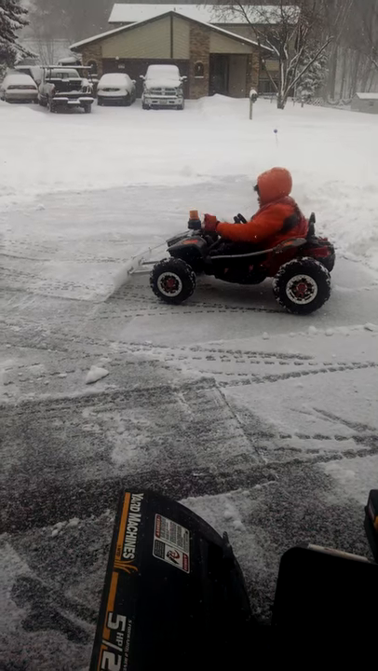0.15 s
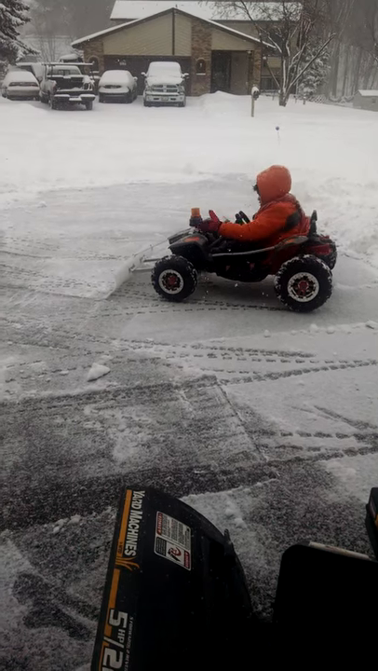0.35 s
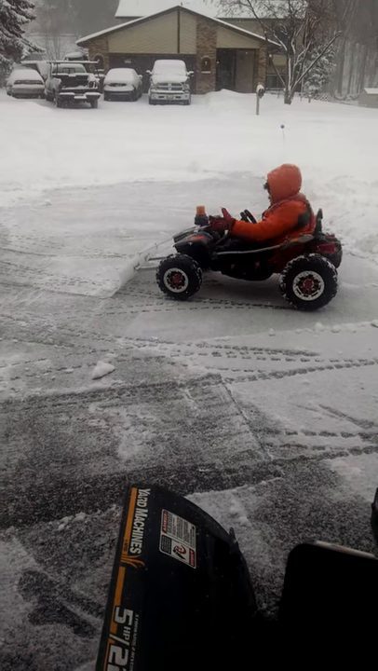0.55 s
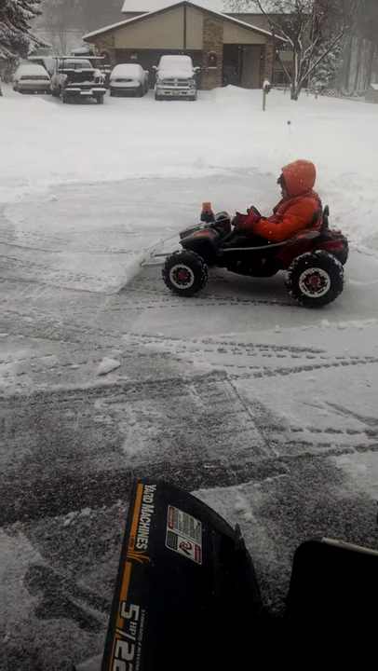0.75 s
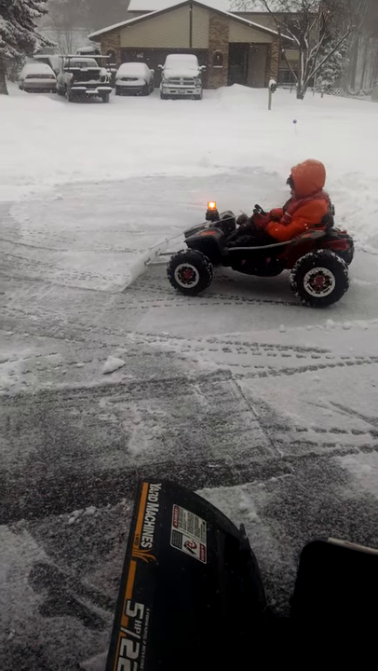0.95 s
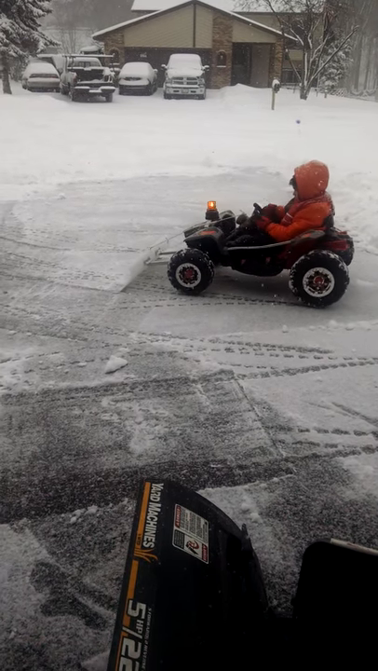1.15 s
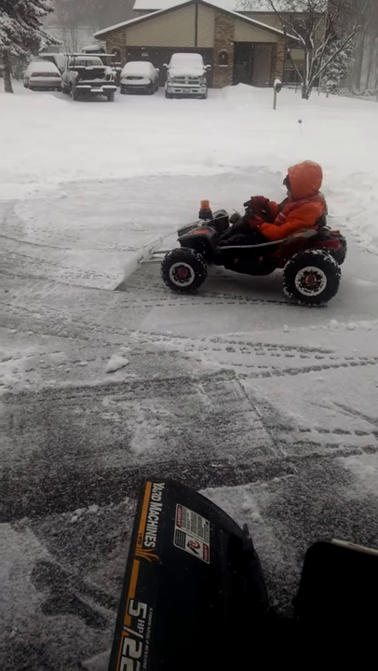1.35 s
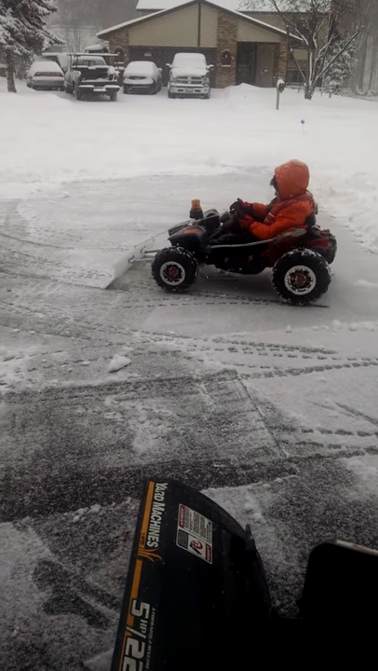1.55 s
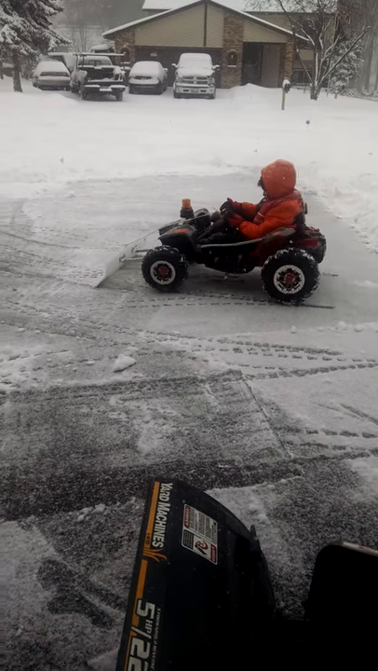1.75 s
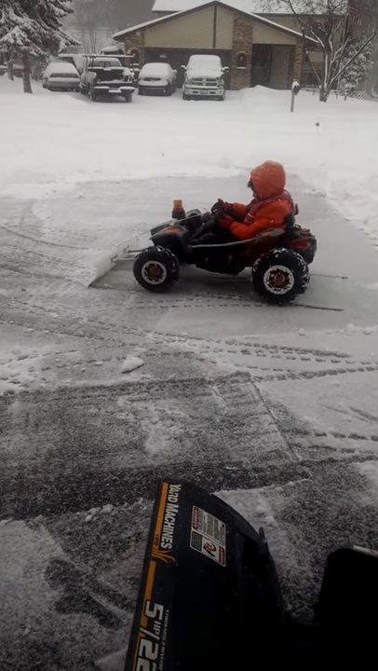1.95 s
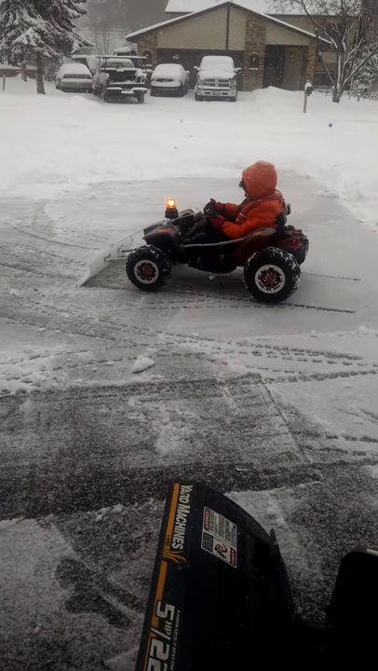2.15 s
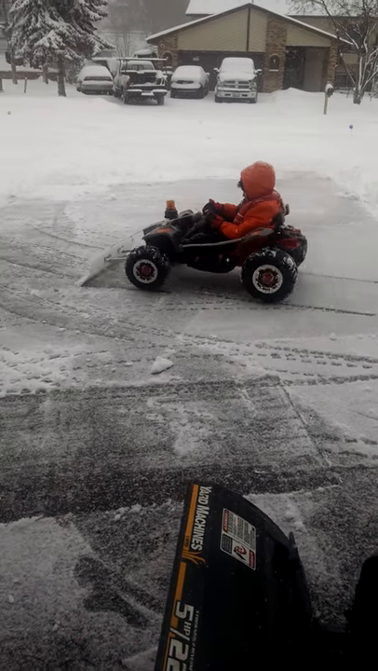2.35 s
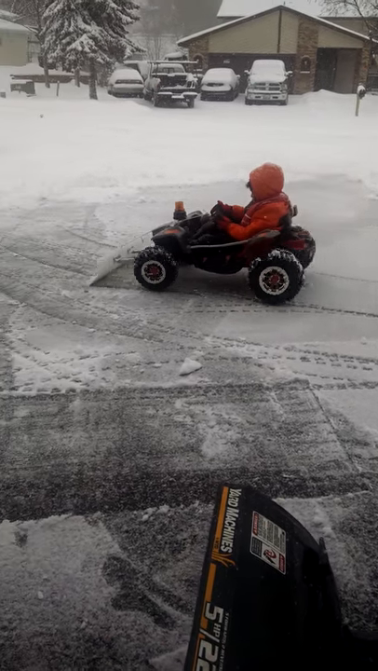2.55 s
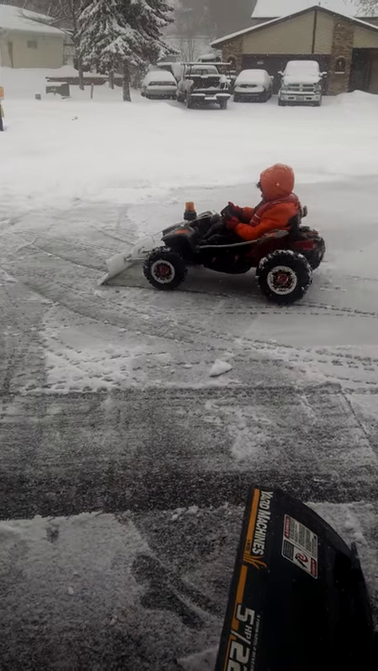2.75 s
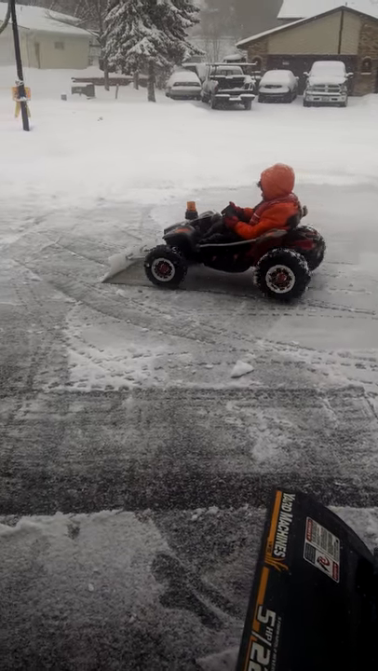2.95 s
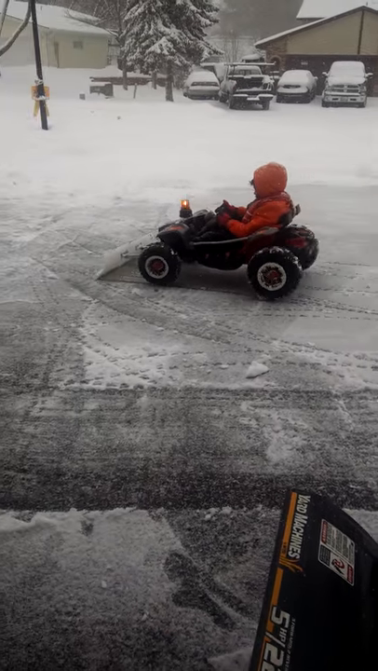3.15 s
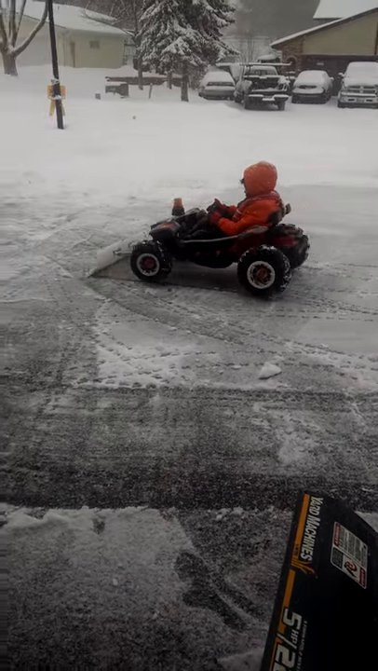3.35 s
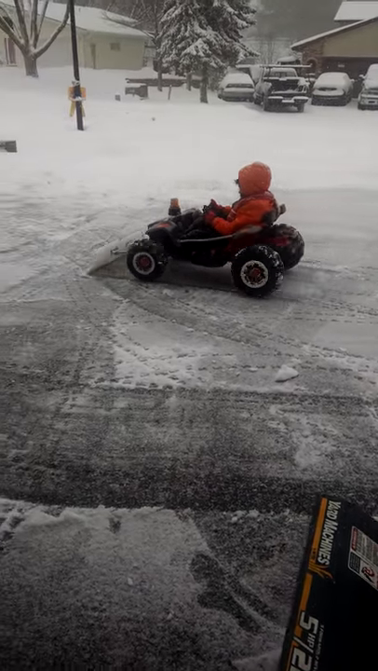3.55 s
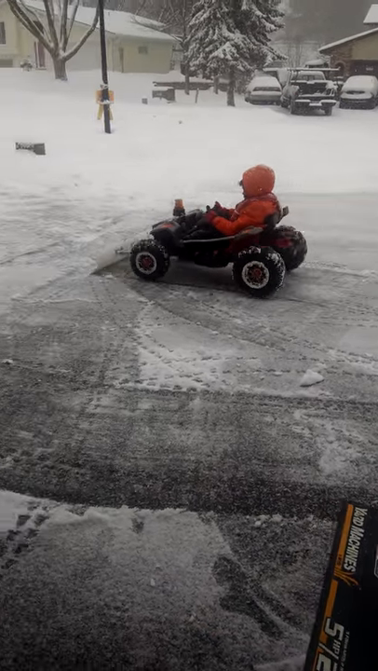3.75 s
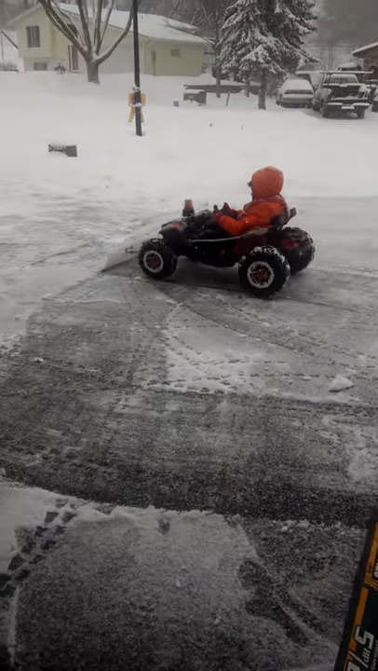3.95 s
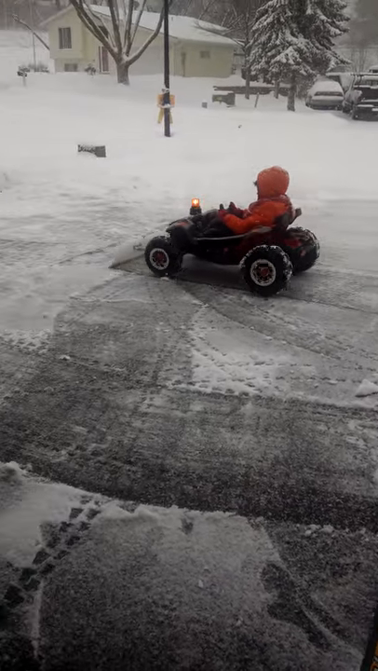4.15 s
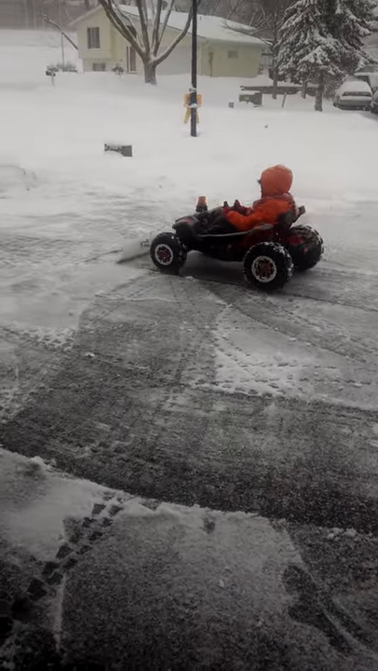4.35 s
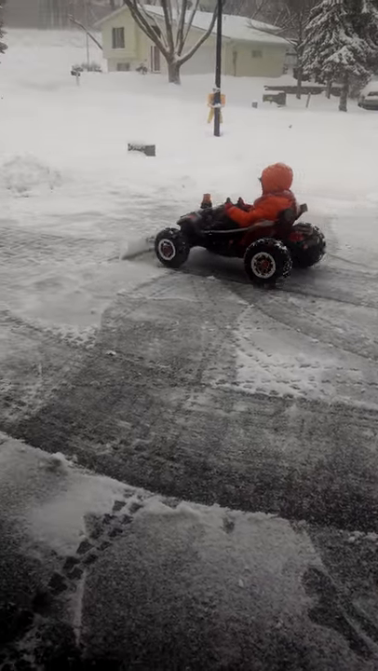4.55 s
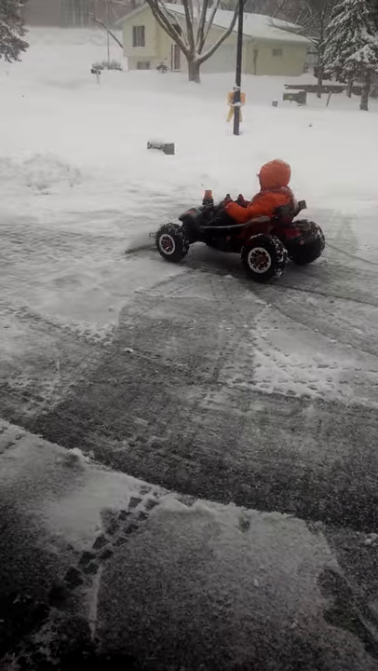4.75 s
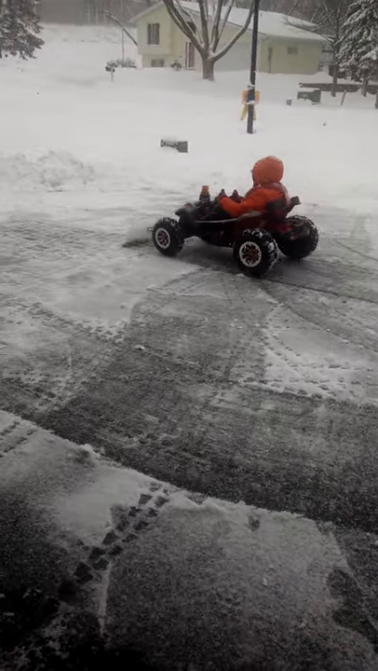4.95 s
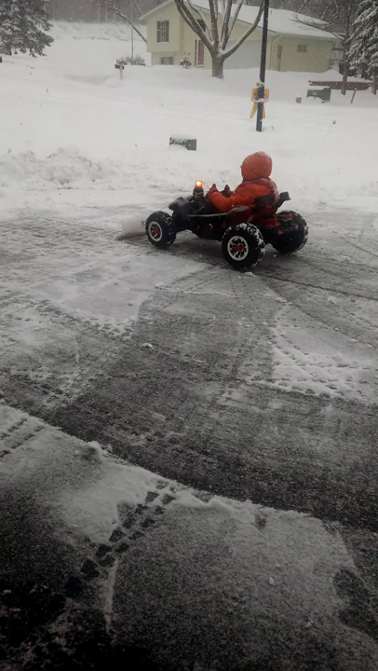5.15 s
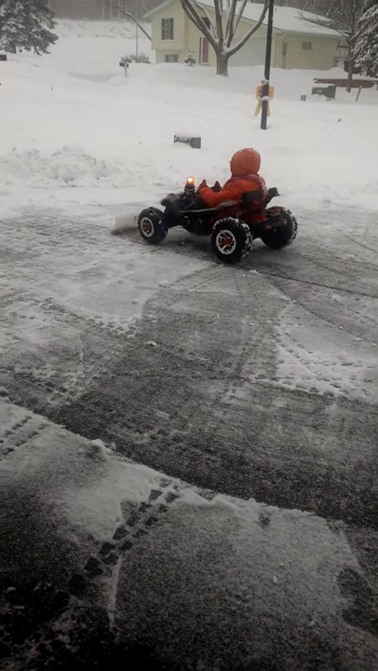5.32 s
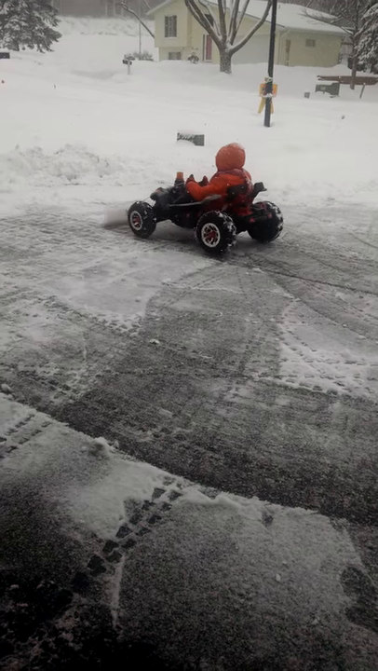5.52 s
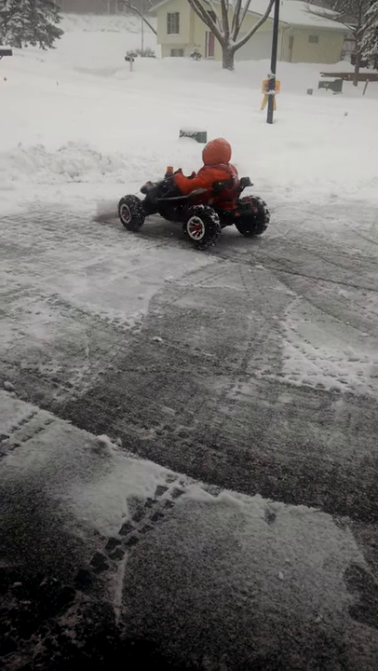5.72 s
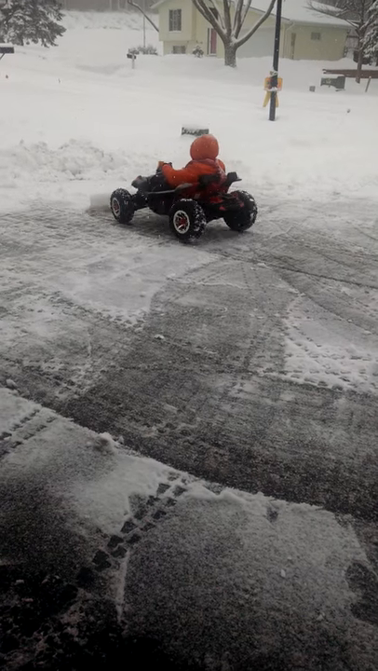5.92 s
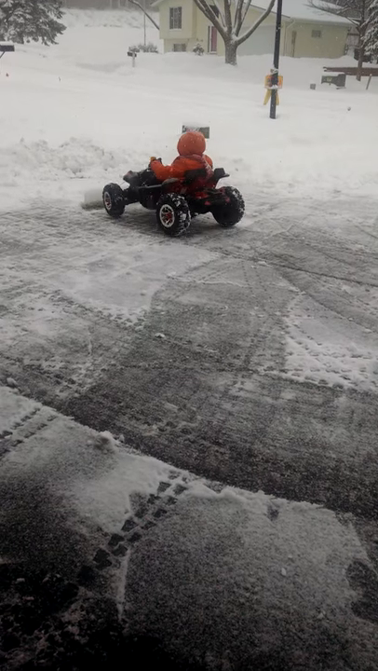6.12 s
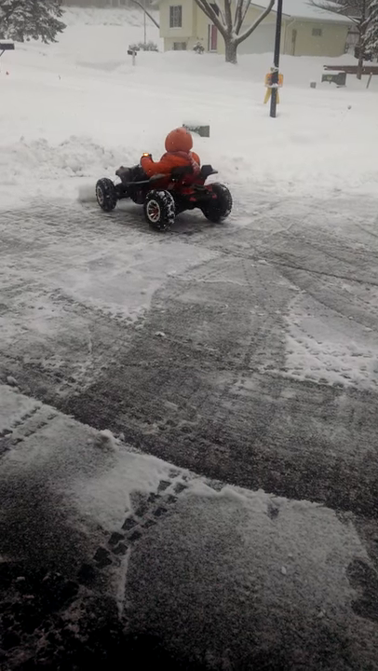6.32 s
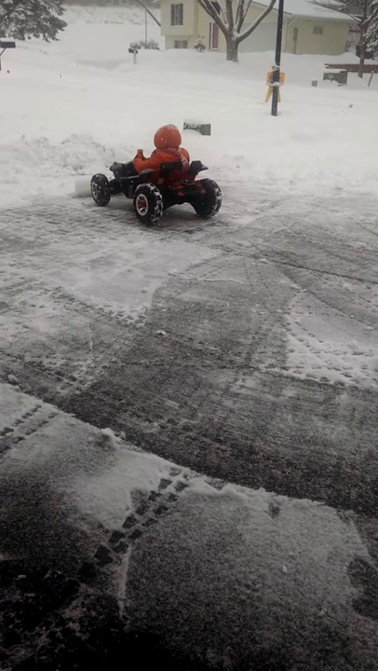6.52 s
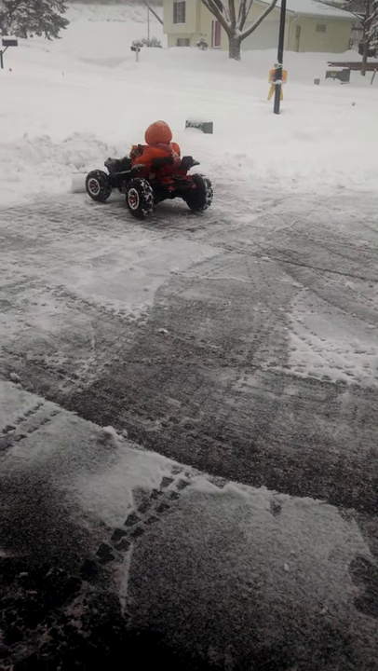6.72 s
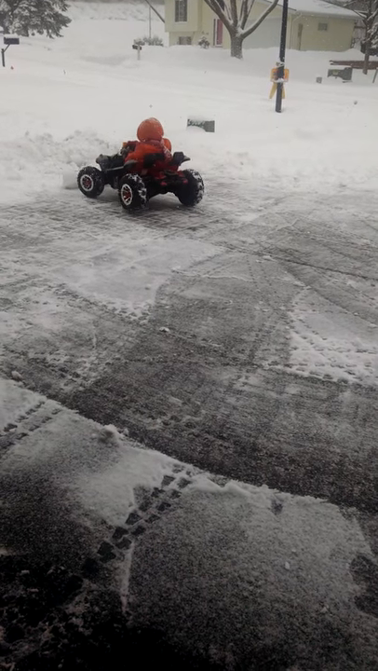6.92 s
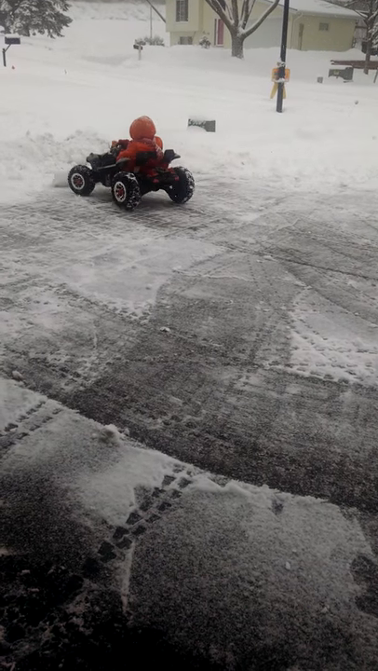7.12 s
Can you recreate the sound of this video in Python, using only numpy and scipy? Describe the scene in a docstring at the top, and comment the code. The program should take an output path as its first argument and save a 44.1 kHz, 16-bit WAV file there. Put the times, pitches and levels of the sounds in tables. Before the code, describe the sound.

A toy buggy's lever clunks twice, then its small electric motors whine up to speed while a plastic plow grinds and hisses over snow.

```python
"""On a snowy drive in still winter air, a lever clunks twice on a battery toy buggy, which then pulls away
pushing a plastic plow. Two geared motors whine up to speed as sums of sines with rough, wandering pitch.
Random contacts, shaped by tone, make the rolling wheels, the blade's grind and the hiss of snow, with ice snaps.
Judder, ridges and clunks ring the hollow body's resonances. A phone hears it all through two ports, each
taking off a delayed part of the other for width."""
import sys
import numpy as np
from scipy import signal
from scipy.fft import rfft, irfft
from scipy.io import wavfile

SR = 44100
rng = np.random.default_rng(int(sys.argv[2]) if len(sys.argv) > 2 else 0)


def generate_wav(signal):
    """Clip the signal to [-1, 1] and save it as 16-bit WAV at the path in sys.argv[1]."""
    frames = np.transpose(np.atleast_2d(signal))
    scaled = np.clip(frames, -1, 1) * 32767
    pcm = np.round(scaled).astype(np.int16)
    wavfile.write(sys.argv[1], SR, pcm)


N = 316636

# Still air, far road and light wind. Each row: pitch in Hz, relative level in dB per Hz.
AIR_SPECTRUM = [(20, -2), (60, -0.5), (150, -10), (350, -3.5), (800, -17), (1600, -24), (2800, -21),
                (3800, -31), (5500, -31.5), (8000, -34.5), (12000, -29), (15200, -34), (15800, -55)]
AIR_DB = -39

# Motors. Each row: time in seconds, gear mesh pitch in Hz, whine level in dB, lift of the upper partials in dB.
MOTOR_RUN = [(1.2, 593, -56, 9), (1.42, 760, -44, -3), (1.55, 788, -41.5, 1), (1.7, 936, -42.5, 9.5),
             (1.82, 1196, -39, 1), (2.02, 1223, -33.5, 2.5), (2.13, 1325, -38.5, 8), (2.3, 1366, -38, 3.5),
             (2.42, 1545, -40, 0), (2.52, 1615, -36, -6), (2.62, 1675, -45.5, -8), (2.75, 1715, -39.5, -6),
             (3.0, 1767, -32.5, -7), (3.4, 1794, -34, -5), (4.0, 1846, -37.5, -2), (4.6, 1847, -34.5, -4.5),
             (5.2, 1848, -36, 0.5), (5.7, 1863, -36.5, 5.5), (6.1, 1870, -37.5, -2.5),
             (6.68, 1798, -45.5, 6), (6.8, 1813, -34.5, -2.5), (7.18, 1680, -44, 5)]
# First three multiples of the gear mesh. Each entry: relative level in dB.
PARTIALS_DB = [0.5, -7.5, -17]
FULL_MESH_HZ = 1850     # gear mesh at full speed
SECOND_MOTOR_RATIO, SECOND_MOTOR_DB = 0.93, -3     # its speed and level beside the first; it is partly hidden
WANDER, CRAWL_SHAKE = 0.009, 0.03     # spread of speed as a share: slow wander, quick wobble at a crawl
ROUGH_HZ, STEADY_TONE = 24, 1.6     # rate of the tooth errors; steady part beside an error spread of 1
MESHES_PER_PINION_TURN, ECCENTRIC = 9.1, 0.18     # the off-centre pinion beats by this share
LUG_SWAY = 0.022     # typical swing of speed, as a share, with each tread lug
SHELL_WHINE_DB = -11     # whine coloured by the shell, beside the direct whine
WHINE_DIPS = 0.79     # share of each dip in dB that the whine follows

# Tread lugs on the ground: gear meshes from lug to lug, place of the first in turns, seconds to take hold.
MESHES_PER_LUG, LUG_PHASE, LUGS_BITE_S = 170, 0.014, 0.12
LUG_CRAWL_DB, LUG_CRUISE_DB = 12, 1.5     # half-scale of the lug throb, slow and at full speed
LUG_SHARPNESS = 1.4     # 0 gives no throb, small an even swell, large short scuffs
# The sound dips for a moment, some dips after a loud snap. Each row: start in seconds, dip strength in dB.
DIPS = [(2.65, 5.5), (3.834, 12.5), (4.559, 5), (5.389, 5), (5.95, 3.5), (6.565, 8.5)]
DIP_FALL_S, DIP_RECOVER_S = 0.018, 0.09     # time constants

# Hollow wheels rolling. Each row: pitch in Hz, relative level in dB per Hz.
ROLL_SPECTRUM = [(40, -26), (75, -1), (112, 8), (140, 0), (180, -2), (260, -23)]
# Wheel roll over time. Each row: time in seconds, level in dB.
ROLL_LEVEL = [(0.86, -55), (1.16, -32.5), (1.3, -46.5), (1.8, -32.5), (2.0, -29), (2.9, -33), (3.45, -27.5),
              (3.9, -30.5), (4.45, -30), (4.65, -36), (4.85, -31.5), (6.0, -28), (7.18, -28.5)]

# Ways the creaking blade rings. Each row: pitch in Hz, relative level in dB, time to fall 60 dB in seconds.
CREAK_MODES = [(804, -2, 0.027), (1040, -1, 0.032), (1616, -11, 0.067), (1920, -2.5, .03)]
# Creak as the slack is taken up. Each row: time in seconds, level in dB.
CREAK_LEVEL = [(1.05, -55), (1.1, -32), (1.14, -30.5), (1.175, -30), (1.2, -36), (1.23, -75)]
# Blade mount humming at a crawl. Each row: time in seconds, level in dB.
HUM_LEVEL = [(1.22, -52), (1.28, -22), (1.34, -40), (1.4, -24.5), (1.7, -27.5), (2.0, -19.5), (2.4, -21),
             (2.7, -24), (3.1, -25), (4.6, -51), (5.4, -51)]
HUM_HZ = 329.3     # middle of the wavering pitch

# Travel over the snow. Each row: time in seconds, body rumble in dB, blade grind in dB, snow hiss in dB.
TRAVEL = [(0.86, -50, -45, -55), (0.99, -41, -33.5, -47), (1.02, -34, -29.5, -47), (1.09, -41, -29.5, -38),
          (1.18, -29, -27.5, -68), (1.23, -44, -38, -62), (1.3, -31, -34.5, -59), (1.5, -55, -29.5, -69),
          (1.8, -34, -25, -46), (2.05, -25, -24, -55), (2.4, -22, -21.5, -42), (2.8, -19, -24, -37),
          (3.2, -16.5, -22.5, -31.5), (3.4, -21, -22.5, -32), (3.75, -18.5, -20.5, -29.5),
          (4.3, -17, -25, -32), (4.8, -19, -26.5, -28), (5.25, -19.5, -21, -30), (5.7, -24, -20.5, -29.5),
          (6.0, -17, -28, -34), (6.12, -27, -23.5, -33), (6.16, -24, -19.5, -29), (6.3, -20, -25, -31.5),
          (6.85, -22.5, -23, -36), (7.18, -24, -24.5, -39)]
RUMBLE_LUMPS_DB, GRIND_LUMPS_DB, ROLL_LUMPS_DB = 1.5, 0.5, 1.5     # slow unevenness of each level
# Snow hiss. Each row: pitch in Hz, relative level in dB per Hz.
HISS_SPECTRUM = [(2000, -0.5), (4200, -7.5), (6000, -6), (7600, -7), (8600, -5.5), (9400, 0.5),
                 (10300, 0.5), (11150, 0), (11700, -1.5), (12400, 3), (13200, -8), (14200, -12.5),
                 (15000, -20), (15500, -14), (15900, -28)]
# Thin blade edge ringing in the hiss. Each row: pitch in Hz, level in dB, time to fall 60 dB in seconds.
EDGE_MODES = [(10100, -34.5, 0.0063), (11040, -12, 0.0069), (12800, -31, .007)]
# Crusts of ice snap. Each row: start in seconds, strength in dB.
SNAPS = [(1.069, -29), (1.088, -16), (1.19, -23), (1.277, -32), (1.388, -25), (1.411, -20.5),
         (1.598, -17.5), (1.637, -25), (2.016, -28), (2.605, -15), (2.713, -17), (3.37, -11), (3.416, -29),
         (3.724, -27), (3.828, -8.5), (4.497, -12.5), (4.583, -21), (4.666, -27), (4.746, -10),
         (5.079, -18), (5.142, -19), (5.167, -9.5), (5.248, -13.5), (5.365, -7.5), (5.427, -12),
         (6.139, -14), (6.246, -19), (6.309, -14), (6.554, -4.5), (6.889, -15)]
SPRAY_T60_S, SNAP_EDGE_DB = 0.014, 2     # spray's time to fall 60 dB; sharp edge over the spray
# Grit knocks the blade. Each row: start in seconds, strength in dB.
KNOCKS = [(2.137, -26), (3.3817, -19), (4.418, -19), (4.478, -16), (5.0925, -15), (5.508, -19),
          (5.5765, -27), (5.7522, -23), (6.1381, -14), (6.1584, -14), (6.266, -17.5)]
KNOCK_BAND_HZ, KNOCK_T60_S = (1500, 4760), 0.067
# Blade grind. Each row: pitch in Hz, relative level in dB per Hz.
GRIND_SPECTRUM = [(150, -51), (260, 4.5), (380, 0.5), (570, -2.5), (900, -10), (1350, -17.5), (1800, -12),
                  (2300, -14.5), (3300, -19), (4200, -24), (6000, -27.5)]
CRUNCH_DB = 0     # fast unevenness of the grind
FLUTTER_DB, FLUTTER_HZ = 2.0, 12     # each band of the grind flutters on its own

# Hollow plastic body. Each row: pitch in Hz, relative level in dB, time to fall 60 dB in seconds.
BODY_MODES = [(232, -17, 0.15), (256.8, 4.5, 0.081), (305.6, -1, 0.087), (342.6, 0.5, 0.095),
              (401, -6.5, 0.058), (555, -8.5, 0.048), (693, -4.5, 0.029), (818, -12, 0.032),
              (985, -14, 0.02), (1101, -4, 0.029), (1245, -27, 0.1), (1370, -11, 0.0073),
              (1707, -0.5, 0.01), (2226, -7, 0.022), (3013, -5.5, 0.034), (3490, -10.5, 0.016)]
# Lever clunks and bounces. Each row: start in seconds, strength in dB, centre of the ring in Hz,
# crack strength in dB, rattle's time to fall 60 dB in seconds.
CLUNKS = [(0.115, -11, 353, -27, 0.071), (0.1209, -2.5, 347, -30, 0.045), (0.13, -24, 350, -25, 0.14),
          (0.139, -2, 1040, -27, 0.15), (0.142, -7, 340, -31, 0.16), (0.186, -14.5, 900, -39, 0.18),
          (0.204, -17, 360, -42, 0.38), (0.217, -29, 900, -34, 0.099), (.27, -20, 345, -55, 0.32),
          (0.293, -19.5, 710, -40, 0.42), (0.667, -28, 620, -24, 0.2), (.678, -14, 700, -35, .1),
          (.688, -7, 617, -24, 0.041), (0.705, 5.5, 1020, -13.5, 0.062), (.7075, -6, 320, -34, 0.057),
          (.726, -7, 980, -33, 0.29), (0.744, -19, 700, -35, 0.079), (0.756, -21, 990, -37, 0.073),
          (0.77, -22, 620, -34, 0.09), (0.789, -27, 800, -38, 0.21), (0.907, -19, 1700, -29, 0.037),
          (.926, -19, 300, -49, .05), (0.962, -10.5, 750, -32, 0.041)]
CRACK_BAND_HZ = (1490, 12700)
# Wheels and blade catch a ridge. Each row: start in seconds, strength in dB.
RIDGES = [(1.698, -12), (1.75, -7), (1.854, -6), (1.97, -6), (2.026, -0.5), (2.214, 0), (2.271, -6),
          (2.35, -2), (2.551, -3), (2.608, 1), (2.709, -2), (2.795, -2), (2.869, -7), (3.091, -15),
          (3.218, -8), (3.262, -4), (3.45, -11), (3.551, -2), (3.72, -3), (3.806, -3), (4.109, -10),
          (4.264, -10), (4.448, -3), (4.526, 0), (4.778, -4), (4.905, -7), (5.51, -1), (5.873, -6),
          (5.907, 0.5), (6.05, -4), (6.19, -4.5), (6.305, -1), (6.527, -18), (6.70, -12), (6.75, -3.5)]
FOCUS_DB = 5.5     # loss per squared octave away from a blow's centre
TOUCH_DB, RATTLE_DB = -15.5, -33.5     # first touch and rattle, beside the blow's strength
RIDGE_DULL_DB = 22     # a ridge is a soft contact: loss per octave above 500 Hz

# The two ports. Each row: pitch in Hz, likeness from 0 to 1, second port over first in dB,
# phase lead of the second port in radians.
PORTS = [(30, 1, 1, 0.5), (60, 1, 0.5, -0.5), (103, 1, -2, 0.5), (264, 0.99, 1.5, -0.22),
         (353, 0.86, 1.5, 0.26), (413, 0.53, 0, -0.85), (520, 0.46, 4.5, -1.5), (570, 0.49, -5.5, -1.1),
         (700, 0.46, 0, -1.0), (840, 0.86, -1.5, -0.7), (1100, 0.8, 2, -0.4), (2010, 0.02, 2.5, -0.5),
         (2860, 0.4, 2.5, -1.1), (3560, 0.6, -1, -2.0), (4600, 0.76, -10.5, -1.5), (4800, 1, -11.5, -3.5),
         (6000, 0.44, -3, -3.5), (7290, 0.9, 3.5, -5), (9040, 0, -1, -11.5), (9260, 0, 8.5, -0.5),
         (11500, 0.47, -1.5, -3), (12200, 0.05, 5, -10), (14700, 0, 2, 20)]
CROSS_LAG, CROSS_GAIN = 17.206, 0.64     # delay in samples, share of the other port taken off
STOP_HZ = 16500     # from here up the output is at least 70 dB down


def from_db(db):
    """Gain of a level in dB."""
    return 10 ** (np.asarray(db) / 20)


def rms_one(x):
    """Scale to rms 1."""
    return x / np.sqrt(np.mean(x ** 2) + 1e-20)


def in_time(rows):
    """Columns of a time table, one value a sample."""
    s, *columns = np.transpose(rows)
    return [np.interp(np.arange(N) / SR, s, column) for column in columns]


def started(rows):
    """0 before the first time in a table, 1 after it."""
    return np.arange(N) > rows[0][0] * SR


def at_hz(points, column=1):
    """One column of a pitch table, spread over the FFT's pitches on a log scale."""
    hz = np.maximum(np.fft.rfftfreq(N, 1 / SR), 1)
    table = np.array(points)
    return np.interp(np.log(hz), np.log(table[:, 0]), table[:, column])


def coloured(x, spectrum):
    """Shape x by the given spectrum, at rms 1."""
    return rms_one(irfft(rfft(x) * from_db(at_hz(spectrum)), N))


def filtered(x, order, hz, kind):
    """Pass x through a smooth high-pass or band-pass filter."""
    return signal.sosfilt(signal.butter(order, hz, kind, fs=SR, output="sos"), x)


def drift(rate_hz):
    """Smooth random wandering of spread 1, made at a tenth of the sample rate."""
    r = np.exp(-20 * np.pi * rate_hz / SR)
    noise = rng.standard_normal(N // 10 + 4002)
    slow = signal.lfilter([1], [1, -2 * r, r * r], noise)[4000:]     # skip the filter's settling
    return np.interp(np.arange(N) / 10, np.arange(len(slow)), rms_one(slow - slow.mean()))


def ring(x, hz, t60):
    """A resonance: each unit click starts a dying sine of height about 1."""
    r, w = from_db(-60 / (t60 * SR)), 2 * np.pi * hz / SR
    return signal.lfilter([0, np.sin(w)], [1, -2 * r * np.cos(w), r * r], x + 1e-18)


def grains(per_s, spread_db):
    """Random contacts of uneven size and sign."""
    size_db = spread_db * np.minimum(rng.exponential(1, N), 5)
    sizes = from_db(size_db) * rng.choice([-1, 1], N)
    return sizes * (rng.random(N) < per_s / SR)


def bursts(rows):
    """Noise that starts at once and dies away, from rows of start, level in dB and 60 dB fall time."""
    envelope = np.zeros(N)
    for s, level_db, t60 in rows:
        start = round(s * SR)
        since = np.arange(SR // 2)[:N - start] / SR
        envelope[start:start + SR // 2] += from_db(level_db - 60 * since / max(t60, .004))
    return envelope * rng.standard_normal(N)


def air():
    """Far road and light wind: shaped noise whose level drifts."""
    return from_db(AIR_DB + drift(8)) * coloured(rng.standard_normal(N), AIR_SPECTRUM)


def lug_throb(speed):
    """Rise and fall in dB as each tread lug scuffs the ground, deepest at a crawl."""
    lugs_per_s = speed * started(MOTOR_RUN) * FULL_MESH_HZ / MESHES_PER_LUG
    turns = np.cumsum(lugs_per_s) / SR - LUG_PHASE
    depth_db = LUG_CRUISE_DB + (LUG_CRAWL_DB - LUG_CRUISE_DB) * np.clip(1 - speed, 0, 1)
    scuff = np.exp(LUG_SHARPNESS * (np.cos(2 * np.pi * turns) - 1))
    bite = np.clip((np.arange(N) / SR - MOTOR_RUN[0][0]) / LUGS_BITE_S, 0, 1) ** 2
    return depth_db * 2 * (scuff - scuff.mean()) * bite


def level_dips():
    """Level change in dB: a quick dip and slower recovery at each listed time."""
    dips_db = 0
    for s, strength_db in DIPS:
        since = np.maximum(np.arange(N) / SR - s, 0)
        dips_db = dips_db - strength_db * (1 - np.exp(-since / DIP_FALL_S)) * np.exp(-since / DIP_RECOVER_S)
    return dips_db


def wheels(level_db):
    """Small contacts with the ground, shaped to the low tone of hollow wheels."""
    return from_db(level_db) * coloured(grains(per_s=300, spread_db=-0.5), ROLL_SPECTRUM)


def lug_sway(mesh_hz):
    """The lugs load the gears: the speed sags and rebounds, never quite evenly."""
    turns = np.cumsum(mesh_hz / MESHES_PER_LUG * (1 + .15 * drift(3))) / SR + rng.random()
    return LUG_SWAY * from_db(2 * drift(3.056)) * np.sin(2 * np.pi * turns)


def motors():
    """Two gear trains: uneven plastic teeth blur each partial, and the shell favours some pitches."""
    mesh_hz, whine_db, upper_db = in_time(MOTOR_RUN)
    shake = CRAWL_SHAKE * np.clip(1 - mesh_hz / FULL_MESH_HZ, 0, 1)
    whine = 0
    for ratio, motor_db in ((1, 0), (SECOND_MOTOR_RATIO, SECOND_MOTOR_DB)):
        motor_hz = mesh_hz * ratio
        unevenness = 1 + WANDER * drift(3.973) + lug_sway(motor_hz) + shake * drift(ROUGH_HZ)
        phase = 2 * np.pi * np.cumsum(motor_hz * unevenness) / SR
        beat = 1 + ECCENTRIC * np.sin(phase / MESHES_PER_PINION_TURN)
        for multiple, level_db in enumerate(PARTIALS_DB, start=1):
            tone = (STEADY_TONE + drift(ROUGH_HZ)) * np.sin(multiple * phase)
            tone = tone + drift(ROUGH_HZ) * np.cos(multiple * phase)
            whine = whine + from_db(motor_db + level_db + upper_db * (multiple > 1)) * beat * tone
    whine = from_db(whine_db) * whine * started(MOTOR_RUN)
    shell = sum(from_db(db) * ring(whine, hz, t60) for hz, db, t60 in BODY_MODES)
    return whine + from_db(SHELL_WHINE_DB) * np.std(whine) * rms_one(shell)


def creak():
    """Uneven slips ring the blade as the slack is taken up."""
    slips = grains(per_s=500, spread_db=2.5)
    level_db, = in_time(CREAK_LEVEL)
    ringing = sum(from_db(db) * ring(slips, hz, t60) for hz, db, t60 in CREAK_MODES)
    return from_db(level_db) * rms_one(ringing)


def hum():
    """The blade sticks and slips: one sine whose pitch and level waver at random."""
    level_db, = in_time(HUM_LEVEL)
    phase = 2 * np.pi * np.cumsum(HUM_HZ * (1 + .025 * drift(15))) / SR
    waver_db = 2.5 * drift(25)
    return from_db(level_db + waver_db) * np.sin(phase) * started(HUM_LEVEL)


def snow_hiss(level_db):
    """Many fine crystal contacts hiss, and noise rings the thin edge of the blade."""
    hiss = coloured(grains(per_s=15000, spread_db=-7.0), HISS_SPECTRUM) * from_db(2 * drift(23.0))
    for hz, edge_db, t60 in EDGE_MODES:
        edge = rms_one(ring(rng.standard_normal(N), hz, t60))
        hiss = hiss + from_db(edge_db + 5.6 * drift(1.9)) * edge
    return from_db(level_db) * hiss


def ice_snaps():
    """Each snap is one sharp edge and a short spray of noise, kept to the treble."""
    out = bursts([(s, db, SPRAY_T60_S) for s, db in SNAPS])
    for s, db in SNAPS:
        out[round(s * SR)] += from_db(db + SNAP_EDGE_DB)
    return filtered(out, 2, 5500, "high")


def grit_knocks():
    """Grit on the blade: dying bursts of noise in a middle band."""
    return filtered(bursts([(s, db, KNOCK_T60_S) for s, db in KNOCKS]), 1, KNOCK_BAND_HZ, "band")


def lever_cracks():
    """The bright crack of each clunk: a short burst of noise in a wide band."""
    rows = [(s, crack_db, .05) for s, db, centre, crack_db, t60 in CLUNKS]
    return filtered(bursts(rows), 1, CRACK_BAND_HZ, "band")


def blade_grind(level_db):
    """Coarse grains grind low, each octave band fluttering on its own."""
    grit = coloured(grains(per_s=3500, spread_db=1.2), GRIND_SPECTRUM)
    edges_hz = 150 * 2 ** np.arange(8)
    grind = 0
    for band_hz in zip(edges_hz, edges_hz[1:]):
        grind = grind + from_db(FLUTTER_DB * drift(FLUTTER_HZ)) * filtered(grit, 2, band_hz, "band")
    return from_db(level_db) * from_db(CRUNCH_DB * drift(25)) * rms_one(grind)


def shell_blows(hz, level_db):
    """Ridges and clunks as one body mode feels them: rows of start, strength in dB, rattle's 60 dB fall time."""
    dull_db = RIDGE_DULL_DB * max(np.log2(hz / 500), 0)
    blows = [(s, db - dull_db, 380, .03) for s, db in RIDGES]
    blows += [(s, db, centre, t60) for s, db, centre, crack_db, t60 in CLUNKS]
    light_db = -14 * (hz < 280)      # a short blow hardly moves the large panels
    return [(s, db + level_db + light_db - FOCUS_DB * np.log2(hz / centre) ** 2, t60)
            for s, db, centre, t60 in blows]


def body(rumble_db, speed):
    """Judder, ridges and clunks ring one shell; a blow favours the modes near its centre."""
    judder = grains(per_s=2500, spread_db=3) * from_db(1.4 * drift(43))
    shaken, struck = 0, 0
    for hz, level_db, t60 in BODY_MODES:
        narrow_db = (1 - speed) * (6 - 20 * abs(np.log2(hz / 335)))      # a crawl favours modes near 335 Hz
        shaken = shaken + from_db(level_db + narrow_db + 1.94 * drift(7.1)) * ring(judder, hz, t60)
        blows = shell_blows(hz, level_db)
        contact = from_db(RATTLE_DB) * bursts(blows)      # the rattle around and after the first touch
        for s, db, _ in blows:
            contact[round(s * SR)] += from_db(db + TOUCH_DB)
        struck = struck + ring(contact, hz, t60)
    shell = from_db(rumble_db) * rms_one(shaken) + struck
    return filtered(shell, 2, 215, "high")      # the shell's sound is kept out of the deep bass


def ports(x, size):
    """The first port hears partly the second's wave, partly one scattered on paths that keep shifting."""
    overlap = size * 3 // 4
    frames = signal.stft(x, nperseg=size, noverlap=overlap)[2]
    turned = frames * np.exp(2j * np.pi * rng.random(frames.shape))      # random phases scatter the wave
    scattered = signal.istft(turned, nperseg=size, noverlap=overlap)[1][:N]
    scattered = rms_one(scattered) * np.std(x)
    alike = np.clip(at_hz(PORTS), -.9995, .9995)
    tilt = from_db(at_hz(PORTS, column=2) / 2)
    shared = alike * rfft(x) * np.exp(-1j * at_hz(PORTS, column=3))
    first = shared + np.sqrt(1 - alike ** 2) * rfft(scattered)
    return irfft(np.array([first / tilt, rfft(x) * tilt]), N)


def scene():
    """The buggy and the air at the two ports, in deep, tonal and crisp groups."""
    speed = in_time(MOTOR_RUN)[0] / FULL_MESH_HZ
    lugs_db, dips_db = lug_throb(speed), level_dips()
    at_rest_db = -60 * (np.arange(N) < TRAVEL[0][0] * SR)      # at rest the scraping is turned far down
    rumble_db, grind_db, hiss_db = [level + at_rest_db + dips_db for level in in_time(TRAVEL)]
    rumble_db = rumble_db + RUMBLE_LUMPS_DB * drift(11.7)
    grind_db = grind_db + GRIND_LUMPS_DB * drift(6.9) + 0.17 * lugs_db
    roll_db = in_time(ROLL_LEVEL)[0] + ROLL_LUMPS_DB * drift(3.0) + at_rest_db + dips_db
    deep = air() + wheels(roll_db) + body(rumble_db, speed)
    tonal = from_db(WHINE_DIPS * dips_db) * motors() + creak() + hum()
    crisp = snow_hiss(hiss_db + lugs_db) + ice_snaps() + grit_knocks() + lever_cracks() + blade_grind(grind_db)
    return ports(deep, size=512) + ports(tonal, size=2048) + ports(crisp, size=128)


def record(dry):
    """Each channel is one port minus the delayed other, which combs the centre; peaks are rounded, the top cut."""
    delay = np.exp(-2j * np.pi * np.fft.rfftfreq(N) * CROSS_LAG)
    late_other = irfft(rfft(dry[::-1]) * delay, N)
    wide = .95 * np.tanh((dry - CROSS_GAIN * late_other) / .95)
    return signal.sosfilt(signal.cheby2(12, 70, STOP_HZ, fs=SR, output="sos"), wide)


dry = scene()
out = record(dry)
generate_wav(out)
```